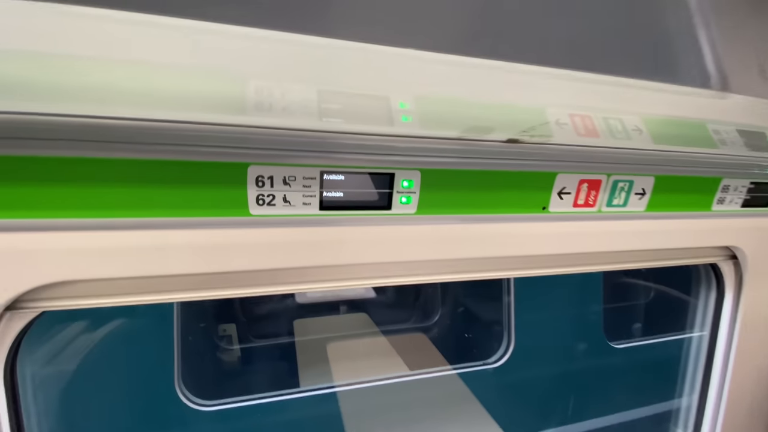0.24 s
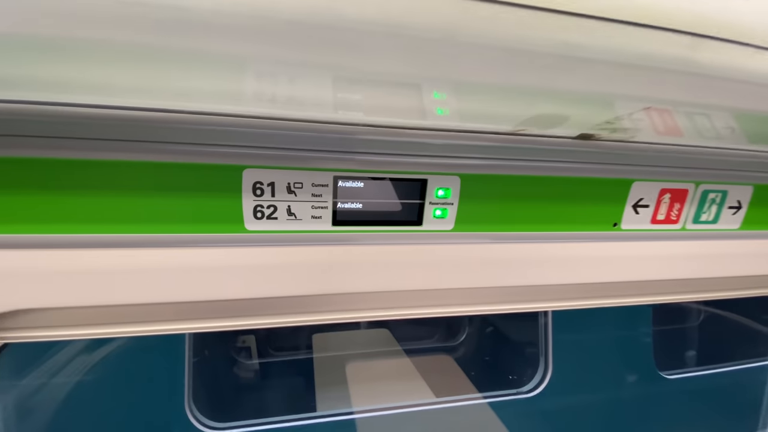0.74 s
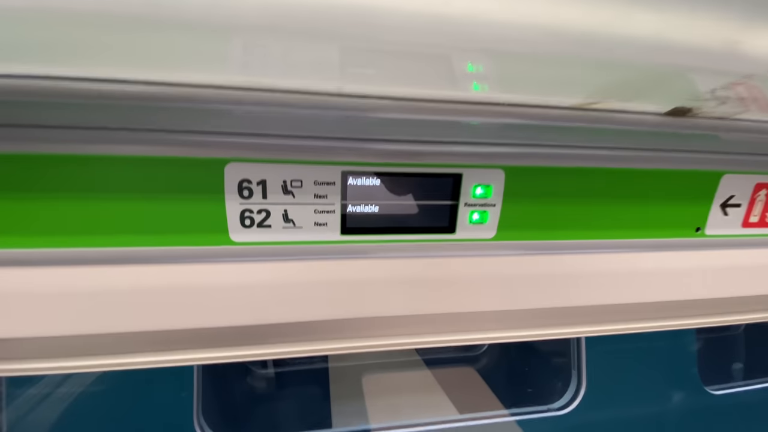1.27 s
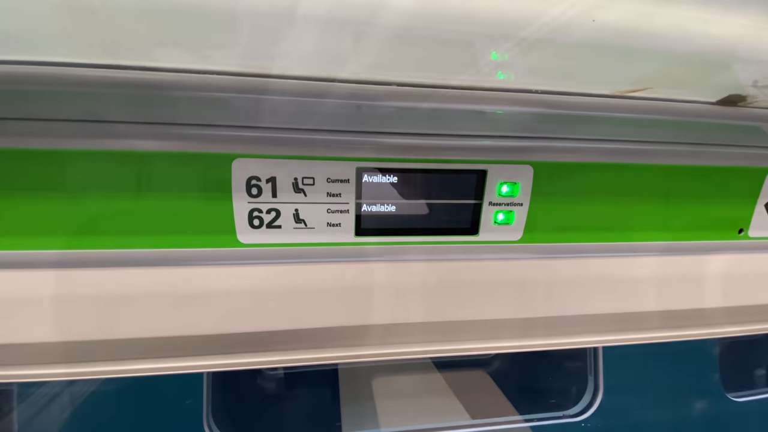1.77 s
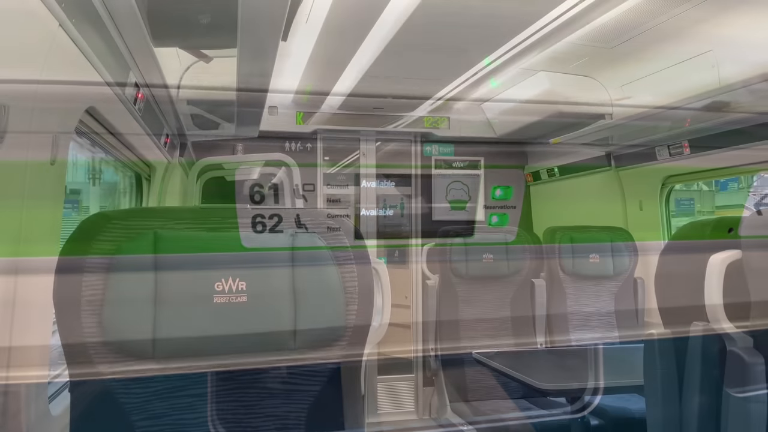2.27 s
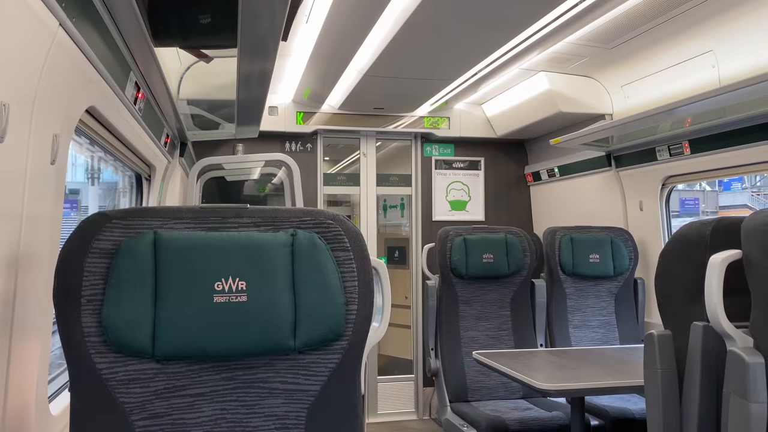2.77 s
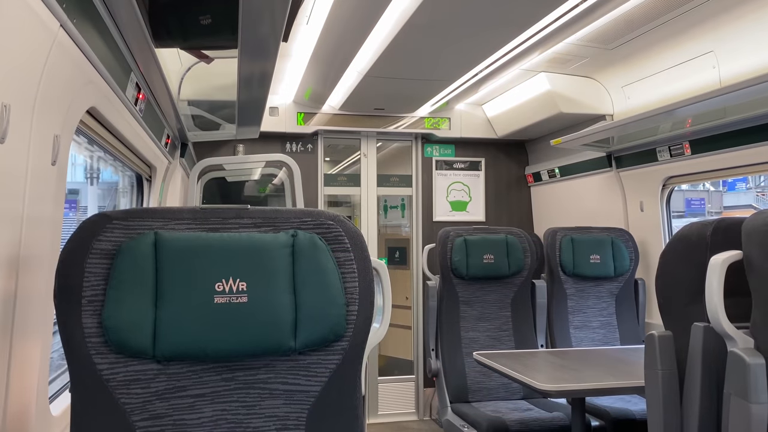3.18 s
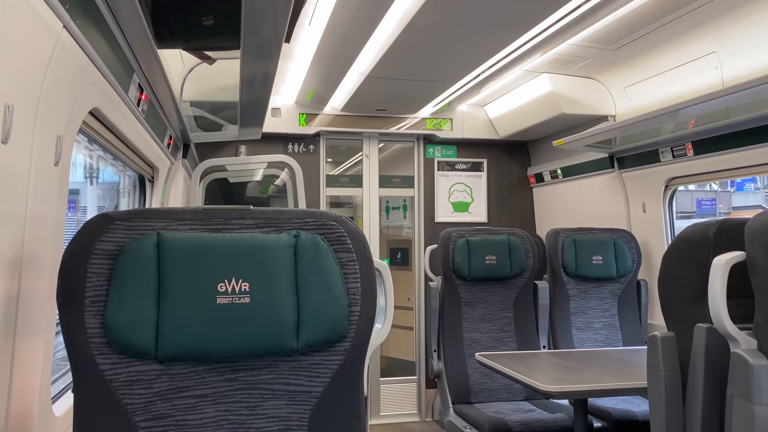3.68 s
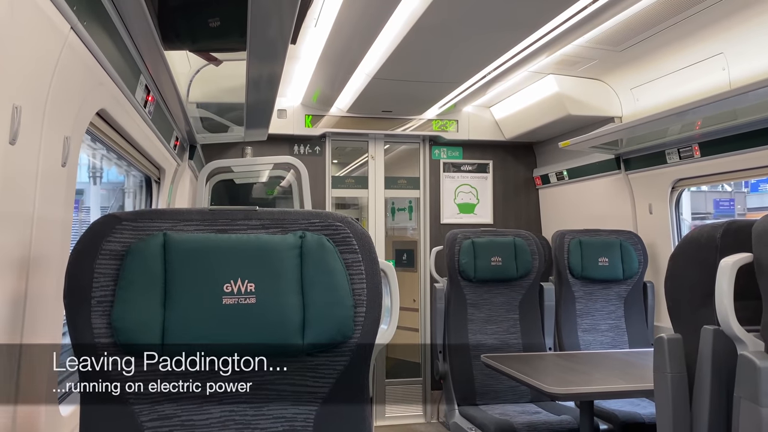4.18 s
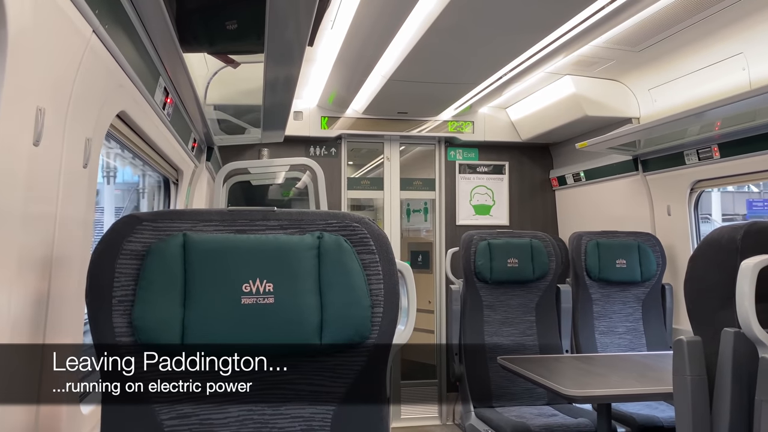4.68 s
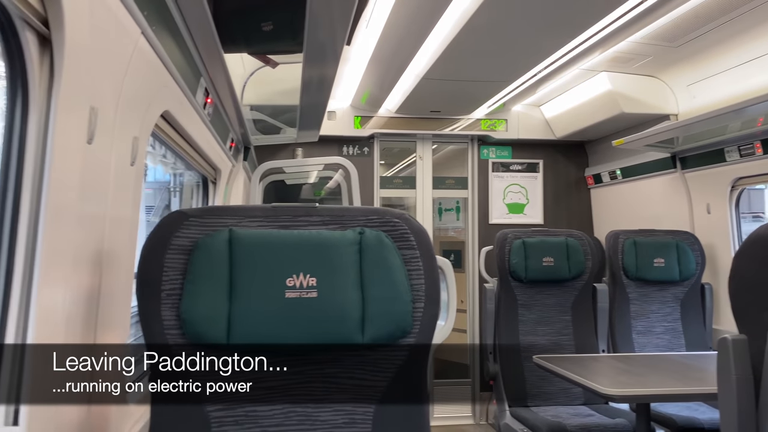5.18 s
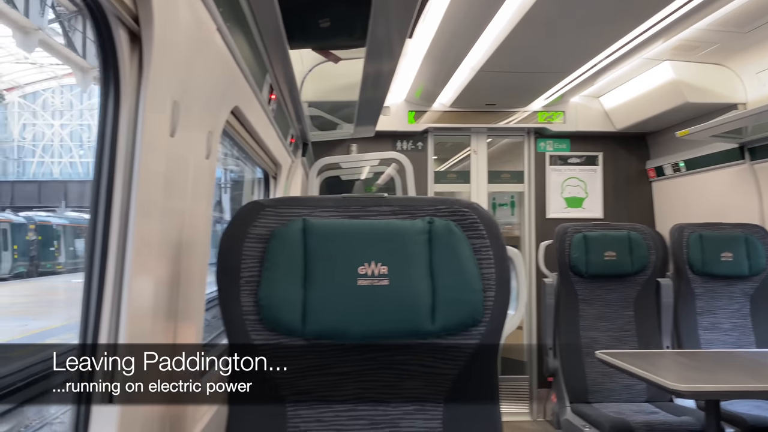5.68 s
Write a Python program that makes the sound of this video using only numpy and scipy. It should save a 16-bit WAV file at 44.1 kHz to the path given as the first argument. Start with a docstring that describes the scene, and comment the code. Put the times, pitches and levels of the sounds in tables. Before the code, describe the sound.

Inside a train carriage, soft rumble with rubbing, knocks and squeaks crossfades to a stronger underfloor hum, with a faint traction whine rising.

```python
"""Inside a train carriage, two places joined by a cross-fade; machine hums are sine tones, air is shaped noise.
First by a window: soft rumble, a droning floor, thin hums, a rush of air; something rubs, hisses and
squeaks (grainy noise, narrow resonances), dull knocks and a creak sound on the left, small clicks.
In the cross-fade a plastic part snaps and clatters (noise bursts through its modes). Then among the seats:
strong hums from under the floor, ventilation gusts, an inverter tone, clicks, later a rising traction whine."""
import sys
import numpy as np
from scipy import signal
from scipy.io import wavfile
from scipy.ndimage import uniform_filter1d

SR = 44100
rng = np.random.default_rng(int(sys.argv[2]) if len(sys.argv) > 2 else 0)


def generate_wav(sig):
    """Save sig (samples, or channels by samples) to the path in sys.argv[1] as 16-bit PCM at SR."""
    pcm = np.round(np.clip(np.atleast_2d(sig).T, -1, 1) * 32767).astype(np.int16)
    wavfile.write(sys.argv[1], SR, pcm)


N = 261513
TIME = np.arange(N) / SR

# cross-fade from window to seats: start t/s, end t/s
FADE_S = (1.937, 2.695)

# air and body noise by the window: f/Hz, relative density/dB per Hz
WINDOW_AIR = [(20, -46), (36, -6), (75, -5.5), (95, -6), (118, -11.5), (180, -14.5), (300, -22.5),
              (500, -26), (900, -30.5), (1050, -40.5), (1900, -38), (2300, -44.5), (4000, -62.5),
              (7000, -75), (11000, -85), (15500, -93)]
# left-right likeness by the window: f/Hz, likeness/1
WINDOW_SAME = [(60, 0.8), (180, 0.62), (550, 0.24), (1650, 0.24), (4970, 0.25), (15000, .05)]
# air along the window, spectrum: f/Hz, relative density/dB per Hz
WINDOW_RUSH_COLOUR = [(600, -39), (1100, 7.5), (1900, -3), (2400, -10.5), (4500, -11.5), (7000, -14.5),
                      (11000, -33.5)]
# air along the window, course: t/s, rms level/dB before patches and fade
WINDOW_RUSH = [(0, -59.5), (.4, -58), (1.59, -57), (1.65, -70.5), (2.3, -64.5)]
# air and body noise among the seats: f/Hz, relative density/dB per Hz
SEATS_AIR = [(24, -46.5), (36, -11.5), (44, -3.5), (56, -6.5), (68, -2), (78, -7.5), (88, -4), (103, -9.5),
             (118, -4.5), (135, -5.5), (150, -5.5), (172, -10), (188, -19), (208, -17), (225, -28.5),
             (245, -19.5), (268, -24.5), (320, -21.5), (360, -24.5), (520, -29), (800, -35), (1320, -36),
             (1480, -39), (2350, -45.5), (2600, -53.5), (6700, -73), (15500, -84.5)]
# left-right likeness among the seats: f/Hz, likeness/1
SEATS_SAME = [(60, 1), (160, 0.98), (290, 0.67), (640, 0.49), (1410, 0.033), (3100, 0.34), (6800, 0.11),
              (15000, .25)]
# air noise among the seats eases, then grows: t/s, gain/dB
SEATS_LEVEL = [(2.3, 2), (3.0, -0.5), (3.8, 0), (4.5, 0.5), (5.2, 0.5), (5.93, 1)]
# faint high hiss among the seats: f/Hz, width per pass/Hz, rms level/dB
THIN_HISS = [(12200, 400, -94), (14600, 500, -90.5)]
# airy top of the ventilation: f/Hz, relative density/dB per Hz
RUSH_COLOUR = [(1500, -35), (2500, 1), (4000, -5.5), (6000, -16.5), (10000, -29), (15500, -43.5)]
# ventilation gusts: t/s, fading time constant/s, level/dB
GUSTS = [(2.53, 0.051, -65), (2.77, 0.092, -64.5), (3.188, 0.068, -67.5), (3.4, 0.39, -70),
         (4.15, 0.079, -67.5), (5.62, 0.07, -70)]

# small clicks: t/s, peak before L-R/dB, L-R/dB, centre f/Hz, width per pass/Hz, tail t60/s (at least 0.004)
CLICKS = [(.6968, -50, -4, 8500, 7000, .01), (1.1797, -51, -4, 7500, 7000, .01),
          (1.652, -60, -4, 9000, 2000, .02), (1.71, -50, -7, 8500, 4000, .012),
          (1.852, -65, -6, 9500, 2000, .015), (2.522, -54, 2.5, 2000, 400, .06),
          (2.5262, -57, 2.5, 5200, 3000, .09), (2.7631, -60, 1, 4500, 4000, .2),
          (2.8719, -56, -.5, 14300, 1500, .12), (3.19, -60, 0, 2800, 1500, .08),
          (3.332, -58, 0, 2330, 150, .1), (3.36, -64, 0, 3900, 500, .12), (4.165, -65, 0, 4000, 3500, .1),
          (4.2872, -62, 0, 4000, 3000, .04), (4.6957, -58, .5, 6000, 3000, .06),
          (4.715, -64, .5, 5500, 2000, .06), (5.37, -60, 0, 1900, 900, .08),
          (5.465, -62, 0, 5500, 4000, .12), (5.745, -65, 1.5, 5500, 5000, .04),
          (5.7595, -60, 1.5, 5800, 2000, .08), (5.8245, -65, .5, 8600, 1500, .015),
          (5.8466, -60, .5, 7500, 5000, .05)]
# dull knocks: t/s, peak before L-R/dB
KNOCKS = [(0.056, -50), (.452, -36.5), (.622, -36), (.929, -43), (1.076, -37.5), (1.147, -41), (1.214, -41),
          (1.706, -53)]
# panel modes under a knock: f/Hz, relative level/dB
KNOCK_MODES = [(590, 9.4), (327, 3)]
# creaks: middle t/s, length/s, peak of envelope/dB
CREAKS = [(1.498, 0.11, -46.5), (1.565, 0.061, -45.5), (1.62, 0.12, -55)]
# creaking plastic panel: f/Hz, width of first pass/Hz, relative level/dB
PANEL = [(1000, 50, -8), (1250, 49, 2), (1420, 50, -4), (1870, 65, -5)]
# snapping plastic part: f/Hz, width in the snap/Hz, relative level/dB, change in the tail/dB
CLACK_MODES = [(1900, 350, 9, 0), (2370, 200, -2, -4), (3480, 260, 2, -3), (4000, 300, -4, -1),
               (4670, 300, 3, -6), (5400, 400, -3, -2), (7000, 1500, -16, 0), (9860, 1500, -11, -5),
               (14000, 2900, -15, -1)]
# rubbing hiss: f/Hz, relative density/dB per Hz
RUB_COLOUR = [(1470, -8.5), (2500, -4), (5160, -15), (6490, -8), (7110, -14), (9950, -7.5), (11300, -28),
              (12100, -52), (12900, -45.5), (13600, -24), (14800, -22), (15500, -31)]
# firmer rubbing strokes: middle t/s, length/s, hiss level before grain/dB
STROKES = [(.04, .07, -82), (.18, .12, -72), (.33, 0.17, -77), (.51, 0.2, -68.5), (.64, .08, -87),
           (.78, 0.11, -71.5), (.96, .1, -78), (1.15, 0.24, -75), (1.27, 0.3, -72.5), (1.55, 0.57, -74.5),
           (1.92, 0.13, -81), (2.01, 0.1, -80.5), (2.31, 0.34, -76), (2.44, 0.17, -85)]
# low and high squeak: f/Hz, width of first pass/Hz, L-R/dB,
# breathy skirt: f/Hz, width per pass/Hz, level re squeak/dB
SQUEAKS = [(6640, 85, 2.5, 6500, 700, -7), (7960, 150, -5, 9400, 1700, 1)]
# squeals, one list per squeak: middle t/s, length/s, peak of envelope/dB
SQUEALS = [
    [(.51, 0.17, -65), (.95, .1, -71), (1.2, 0.13, -73), (1.27, 0.14, -55.5), (1.47, 0.58, -68.5),
     (1.57, 0.095, -64), (2.24, 0.058, -71)],
    [(.1, 0.3, -69), (.5, 0.068, -65), (.64, 0.046, -75), (2.272, .04, -65), (2.33, 0.2, -68)],
]

# floor boom by the window: t/s, rms level before L-R/dB
BOOM = [(0, -35), (.25, -44.5), (.8, -36), (1.0, -43.5), (1.42, -30.5), (1.6, -48), (1.93, -33.5),
        (2.12, -41), (2.4, -52)]
# inverter: multiple/1, rms level/dB, growth/dB per s, lower sideband re tone/dB, upper/dB, L-R/dB, left lead/rad
INVERTER = [(1, -61, 1, -5, 0, 1, 2.5), (2, -76, 0, -4, -3, 0, .5), (3, -84.5, .4, -4, -5, 3, 1)]
# traction drive orders: multiple of base pitch/1, rms level before body gain/dB
WHINE_ORDERS = [(2, -48), (3, -52)]
# body resonances carrying the whine: f/Hz, width/Hz, gain/dB
BODY = [(183, 4.7, 5.5), (272, 82, -6.5), (325, 27, -3.5), (332, 6.1, -10.5), (360, 18, -2),
        (388.4, 8.6, 3.5), (410, 14, -2), (462, 12, 1), (497, 14, -1), (511, 14, 0)]
# steady hums by the window: f/Hz, rms level at 0.86 s before swells/dB, growth/dB per s, L-R/dB, left lead/rad
WINDOW_HUMS = [(41.3, -49, -2, -1, -.25), (48.7, -48, 0, -.5, -.28), (87.4, -47, -2, -1.5, -.5),
               (299.5, -53, 0, -4.3, -.83), (605, -63.5, -5, 0, 0), (638.3, -58, 0, 8.6, .46),
               (836.4, -57.5, 1, -1.9, -.1), (1846, -78, 2, 0, 1)]
# steady hums among the seats: f/Hz, rms level at 2.2 s before swells/dB, growth/dB per s, L-R/dB, left lead/rad
SEATS_HUMS = [(41.4, -28.8, 0, -.2, -.03), (47.7, -37.7, 0, -.4, -.05), (68.5, -41, 0, -.4, -.05),
              (127.2, -30.5, 0, -.1, -.06), (146.5, -41.7, 0, .2, -.16), (250.5, -56, 0, -6, -1.3),
              (254.3, -52.5, 0, -6, -1.3), (299.5, -42.6, 0, -3.5, -.77), (438, -57, 0, 0, 0),
              (488, -62, 0, 0, 0), (508.7, -61, 0, -7.5, -.4), (637.3, -65, 0, -5, .8),
              (835.4, -66, -.5, -1.5, .2)]
# swell of the strong hum near 127 Hz: t/s, gain/dB
MAIN_HUM = [(2.0, 3.5), (2.6, 2), (2.95, 4), (3.1, 0.5), (3.3, 3), (3.75, -2.5), (4.3, 1), (4.7, 0),
            (5.1, -1.5), (5.33, 3), (5.5, -3), (5.75, 3.5), (5.93, -6)]

WINDOW_DB, WINDOW_LAG_S = -37, 0.00033  # right channel lags
SEATS_DB = -31
RUSH_DB, GUST_RISE_S = -73.5, .015  # rise is a time constant
KNOCK_PAN_DB = 13
CLACK_S, CLACK_DB, CLACK_SNAP_S, CLACK_RATTLE_DB = 2.4045, -43, .009, 1
CLACK_TAIL_SPREAD, CLACK_TAIL_DB, CLACK_TAIL_T60_S = 3.5, 9.5, 0.27  # spread widens the modes
RUB_DB, RUB_LIFTED_DB, RUB_END_S, RUB_RELEASE_S = -80, -93, 1.71, .015  # light contact, then lifted
BOOM_HZ, BOOM_RISE_HZ_PER_S = 66.3, 2.604
INVERTER_HZ = 1048.9
SIDEBAND_HZ, SIDEBAND_RISE_HZ_PER_S, SIDEBAND_SWELL_S = 9.5, 2.4, .5  # spacing at whine start, widening
WHINE_START_S, WHINE_HZ = 3.3, 80
WHINE_RISE_HZ_PER_S, WHINE_BEND_HZ_PER_S2 = 26.3, 2.85
THIN_HUM_HZ, THIN_HUM_START_DB, THIN_HUM_SWELL_S = 836, -40, 0.13  # swells in by the window
MAIN_HUM_HZ = 127
CLEAR_HUM_HZ, CLEAR_HUM_SINK_S, CLEAR_HUM_SINK_DB_PER_S = 300, 5.3, -7  # sinks late
BRIEF_HUM_HZ, BRIEF_HUM_END_S, BRIEF_HUM_SINK_DB_PER_S = 438, 3.65, -40  # dies away
EDGE_HZ = 15700


def amp(db):
    """Amplitude from dB."""
    return 10 ** (np.asarray(db) / 20)


def evened(x):
    """Scales to rms 1."""
    return x / np.sqrt(np.mean(x ** 2) + 1e-20)


def read(points, hz):
    """Reads a spectrum table along log frequency."""
    f, value = np.transpose(points)
    return np.interp(np.log(hz + 1), np.log(f + 1), value)


def curve(rows):
    """Reads a (time, value) table at every sample."""
    s, value = np.transpose(rows)
    return np.interp(TIME, s, value)


def sides(pan_db):
    """Left and right gains, pan_db apart."""
    return amp(np.array([[pan_db / 2], [-pan_db / 2]]))


def phases(lead):
    """Left and right phase offsets in radians, lead apart."""
    return np.array([[lead / 2], [-lead / 2]])


def drift(top_hz):
    """Slow chance of rms 1: sines of random phase up to top_hz, the slower the stronger."""
    t, slow = TIME[::64], 0
    for f in np.geomspace(top_hz / 20, top_hz, 16):
        slow = slow + np.sin(2 * np.pi * (f * t + rng.random())) / np.sqrt(f)
    return np.interp(TIME, t, evened(slow))


def bumps(rows):
    """Smooth rises and falls, summed as power."""
    power = 0
    for s, length, db in rows:
        arch = np.cos(np.pi * np.clip((TIME - s) / length, -.5, .5)) ** 2
        power = power + (amp(db) * arch) ** 2
    return np.sqrt(power)


def resonate(x, hz, width):
    """Shifts hz down to zero, smooths, and shifts back: a resonance of gain 1."""
    turn = np.exp(2j * np.pi * hz * np.arange(x.shape[-1]) / SR)
    r = np.exp(-np.pi * width / SR)
    return 2 * (turn * signal.lfilter([1 - r], [1, -r], x / turn)).real


def ringing(x, hz, width, second_width):
    """Two resonances in series at one frequency."""
    return resonate(resonate(x, hz, width), hz, second_width)


def air(colour, same, lag_s, patchy_db, size=2048):
    """Two partly alike channels of coloured noise with drifting time-frequency patches, rms 1."""
    frames, hz = N // (size // 4) + 5, np.fft.rfftfreq(size, 1 / SR)
    a, b, c, d, patches = rng.standard_normal((frames, len(hz), 5)).T
    patches = uniform_filter1d(patches, size=20, axis=0)
    patches = evened(uniform_filter1d(patches, size=6, axis=1))
    alike = np.clip(read(same, hz), -1, 1)[:, None]
    left, own = a + 1j * b, c + 1j * d
    lag = np.exp(-2j * np.pi * hz * lag_s)[:, None]
    right = alike * left * lag + np.sqrt(1 - alike ** 2) * own
    z = np.array([left, right]) * amp(read(colour, hz)[:, None] + patchy_db * patches)
    return evened(signal.istft(z, nperseg=size, noverlap=size * 3 // 4)[1][:, :N])


def window_air():
    """Soft rumble: low-weighted noise, level drifting slowly."""
    level = amp(WINDOW_DB + 1.0 * drift(top_hz=0.96)) * sides(-1.9)
    return level * air(WINDOW_AIR, WINDOW_SAME, WINDOW_LAG_S, patchy_db=2.0)


def window_rush():
    """Mid-band rush of air along the window."""
    noise = air(WINDOW_RUSH_COLOUR, WINDOW_SAME, WINDOW_LAG_S, patchy_db=2.1, size=1024)
    return amp(curve(WINDOW_RUSH)) * noise


def seats_air():
    """Air and body noise among the seats, nearly mono in the bass."""
    level = amp(SEATS_DB + curve(SEATS_LEVEL) + 0.68 * drift(top_hz=6.0)) * sides(-0.3)
    return level * air(SEATS_AIR, SEATS_SAME, 0, patchy_db=1.12, size=4096)


def thin_hiss():
    """Two narrow bands of steady hiss."""
    out = 0
    for hz, width, db in THIN_HISS:
        out = out + amp(db) * evened(ringing(rng.standard_normal(N), hz, width, width))
    return out


def rush():
    """The airy top of the ventilation, with gusts that come quickly and fade."""
    level = amp(RUSH_DB)
    for s, fading_s, db in GUSTS:
        t = TIME - s
        level = np.hypot(level, amp(db) * np.exp(np.minimum(t / GUST_RISE_S, -t / fading_s)))
    return level * air(RUSH_COLOUR, SEATS_SAME, 0, patchy_db=3.5, size=512)


def clicks():
    """A sharp tick and a noisy tail, coloured around the centre."""
    out, t = np.zeros((2, N + 8000)), np.arange(8000) / SR
    for s, db, pan_db, hz, width, t60 in CLICKS:
        shared, own = rng.standard_normal(8000), rng.standard_normal((2, 8000))
        sharp = amp(-60 * t / 0.014)
        tail = (1 - np.exp(-t / 0.0028)) * amp(-60 * t / max(t60, .004))
        burst = (shared + 0.23 * own) * (sharp + 0.79 * tail)
        tick = ringing(burst, hz, width, width)
        out[:, round(s * SR):][:, :8000] += amp(db) * sides(pan_db) * tick / abs(tick).max()
    return out[:, :N]


def knocks():
    """Short dull blows ring two low modes of a panel; the right channel is weak and inverted."""
    out, t = np.zeros((2, N + 4000)), np.arange(4000) / SR
    shape = (1 - np.exp(-t / .0015)) * amp(-60 * t / .022)
    blow = shape * sum(amp(db) * np.sin(2 * np.pi * hz * t) for hz, db in KNOCK_MODES)
    blow = sides(KNOCK_PAN_DB) * [[1], [-1]] * blow / abs(blow).max()
    for s, db in KNOCKS:
        out[:, round(s * SR):][:, :4000] += amp(db) * blow
    return out[:, :N]


def creak():
    """Dense uneven slips ring a plastic panel on the left; the right is weaker and inverted."""
    slips = rng.standard_normal(N) * (rng.random(N) < 400 / SR)  # about 400 slips per s
    ring = 0
    for hz, width, db in PANEL:
        ring = ring + amp(db) * evened(ringing(slips, hz, width, 4 * width))
    return bumps(CREAKS) * evened(ring) * np.array([[1], [-.4]])


def clack():
    """A plastic part snaps: a short rough burst through its modes, then a clattering tail, rung more broadly."""
    t = np.maximum(TIME - CLACK_S, 0)
    shared, own = rng.standard_normal(N), rng.standard_normal((2, N))
    noise = (shared + 0.76 * own) * (1 - np.exp(-t / .001))
    snap = noise * (t < CLACK_SNAP_S)
    rattle = amp(CLACK_RATTLE_DB * drift(top_hz=88.6))
    tail = noise * rattle * (1 - np.exp(-t / 0.019)) * amp(CLACK_TAIL_DB - 60 * t / CLACK_TAIL_T60_S)
    ring = 0
    for hz, width, db, tail_db in CLACK_MODES:
        broad = min(width * CLACK_TAIL_SPREAD, 2500)
        for burst, wide in ((snap, width), (amp(tail_db) * tail, broad)):
            ring = ring + amp(db) * ringing(burst, hz, wide, wide) / np.sqrt(wide)
    return amp(CLACK_DB) * ring / abs(ring).max()


def rubbing():
    """Stick-slip: grainy hiss under each stroke, plus noise-driven resonances for the two squeaks."""
    contact = amp(RUB_DB) * np.exp(-np.maximum(TIME - RUB_END_S, 0) / RUB_RELEASE_S)
    contact = contact + amp(RUB_LIFTED_DB) * (TIME < FADE_S[1])
    grain = amp(7.0 + 1.8 * drift(top_hz=121.6))
    hiss = air(RUB_COLOUR, [(100, .2), (15000, .2)], 0, patchy_db=1.9, size=512)
    out = np.hypot(contact, bumps(STROKES)) * grain * sides(-6.5) * hiss
    for (hz, width, pan_db, skirt_hz, skirt_width, skirt_db), squeals in zip(SQUEAKS, SQUEALS):
        drive = rng.standard_normal((2, N))
        ring = evened(ringing(drive, hz, width, 3 * width))
        skirt = evened(ringing(drive, skirt_hz, skirt_width, skirt_width))
        out += bumps(squeals) * sides(pan_db) * (ring + amp(skirt_db) * skirt)
    return out


def boom():
    """The floor panel drones at its lowest resonance, creeping up in pitch."""
    hz = BOOM_HZ + BOOM_RISE_HZ_PER_S * TIME + 1.05 * drift(top_hz=3.74)
    tone = np.sin(2 * np.pi * np.cumsum(hz) / SR)
    return np.sqrt(2) * amp(curve(BOOM)) * tone * sides(-1.1)


def inverter():
    """The switching tone and its overtones, each flanked by two sidebands once the motors turn."""
    t = np.maximum(TIME - WHINE_START_S, 0)
    turning = 2 * np.pi * (SIDEBAND_HZ + SIDEBAND_RISE_HZ_PER_S * t / 2) * t
    out = 0
    for order, db, growth, lower_db, upper_db, pan_db, lead in INVERTER:
        angle = 2 * np.pi * order * INVERTER_HZ * TIME + phases(lead)
        flanks = amp(lower_db) * np.sin(angle - turning) + amp(upper_db) * np.sin(angle + turning)
        level = amp(db + growth * (TIME - FADE_S[1]) + 1.5 * drift(top_hz=5))
        swell = 1 - np.exp(-t / SIDEBAND_SWELL_S)
        out = out + level * sides(pan_db) * (np.sin(angle) + swell * flanks)
    return np.sqrt(2) * out


def whine():
    """Orders 2 and 3 of the traction drive, climbing with speed through the resonances of the body."""
    t = np.maximum(TIME - WHINE_START_S, 0)
    hz = WHINE_HZ + WHINE_RISE_HZ_PER_S * t + WHINE_BEND_HZ_PER_S2 * t ** 2
    angle, tone = 2 * np.pi * np.cumsum(hz) / SR, 0
    for order, db in WHINE_ORDERS:
        body = 0
        for f, width, peak_db in BODY:
            body = body + amp(peak_db) / (1 + (2 * (order * hz - f) / width) ** 2)
        tone = tone + amp(db) * body * np.sin(round(order) * angle)
    return np.sqrt(2) * tone * (t > 0) * sides(-1.4)


def hums(table, middle_s, waver_db, swells):
    """Steady machine tones; the higher ones waver more, as the paths through the body shift."""
    out = np.zeros((2, N))
    for hz, db, growth, pan_db, lead in table:
        swell_db = sum(curve_db for near_hz, curve_db in swells if abs(hz / near_hz - 1) < .06)
        waver = waver_db * np.log10(hz / 30) * drift(top_hz=8)
        level = np.sqrt(2) * amp(db + growth * (TIME - middle_s) + waver + swell_db)
        out += level * sides(pan_db) * np.sin(2 * np.pi * hz * TIME + phases(lead))
    return out


def window_hums():
    """Thin hums by the window; the one near 836 Hz swells in."""
    swell_db = THIN_HUM_START_DB * np.exp(-TIME / THIN_HUM_SWELL_S)
    return hums(WINDOW_HUMS, middle_s=0.86, waver_db=0.53, swells=[(THIN_HUM_HZ, swell_db)])


def seats_hums():
    """Strong hums of machinery under the floor; three of them follow their own level courses."""
    sink_db = CLEAR_HUM_SINK_DB_PER_S * np.maximum(TIME - CLEAR_HUM_SINK_S, 0)
    stop_db = BRIEF_HUM_SINK_DB_PER_S * np.maximum(TIME - BRIEF_HUM_END_S, 0)
    swells = [(MAIN_HUM_HZ, curve(MAIN_HUM)), (CLEAR_HUM_HZ, sink_db), (BRIEF_HUM_HZ, stop_db)]
    return hums(SEATS_HUMS, middle_s=2.2, waver_db=0.43, swells=swells)


def scene():
    """Cross-fades the two places; contact sounds stay outside the fade."""
    share = np.clip((TIME - FADE_S[0]) / (FADE_S[1] - FADE_S[0]), 0, 1)
    window = window_air() + window_rush() + boom() + window_hums()
    seats = seats_air() + thin_hiss() + rush() + inverter() + whine() + seats_hums()
    contacts = clicks() + knocks() + creak() + clack() + rubbing()
    return (1 - share) ** 1.7 * window + share * seats + contacts


def record(dry):
    """The microphone cuts the lowest bass; then the band limit."""
    high_pass = signal.butter(8, 36, "high", fs=SR, output="sos")
    cut = signal.sosfilt(high_pass, dry)
    low_pass = signal.firwin(511, EDGE_HZ, window=("kaiser", 9), fs=SR)
    return signal.oaconvolve(cut, low_pass[None], "same")


dry = scene()
out = record(dry)
generate_wav(out)
```